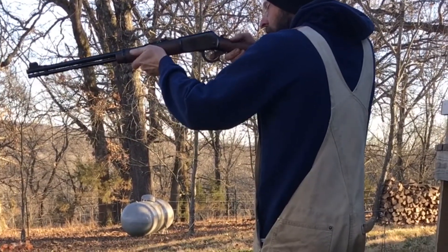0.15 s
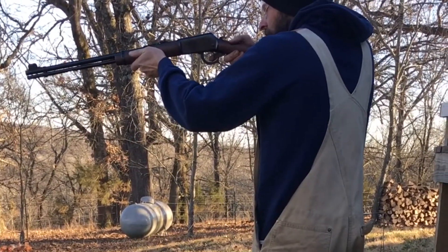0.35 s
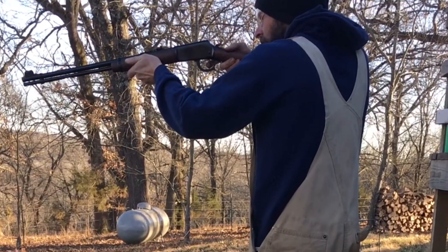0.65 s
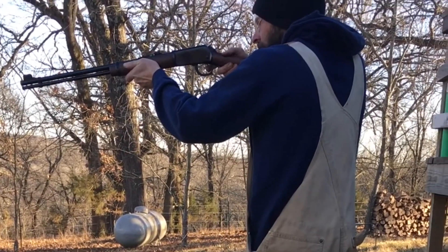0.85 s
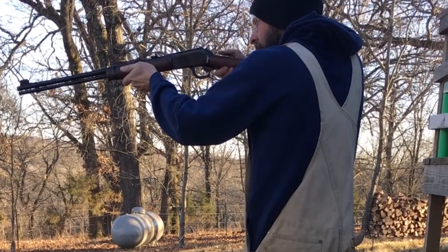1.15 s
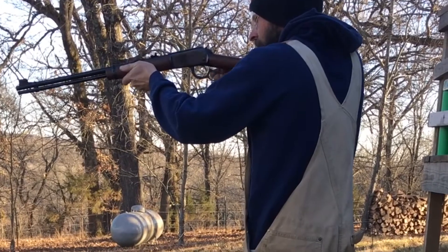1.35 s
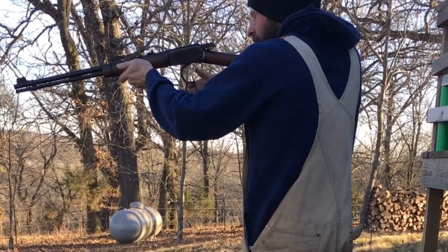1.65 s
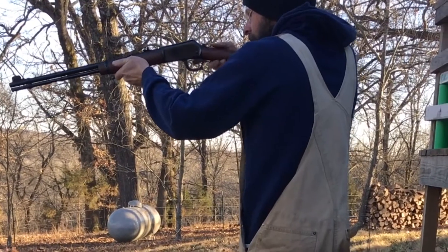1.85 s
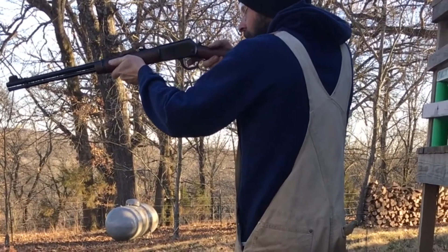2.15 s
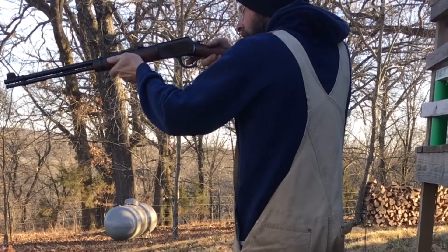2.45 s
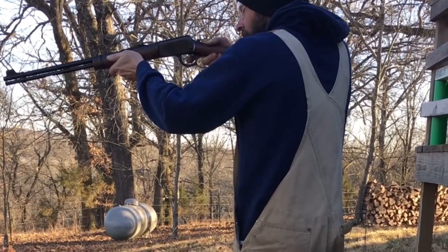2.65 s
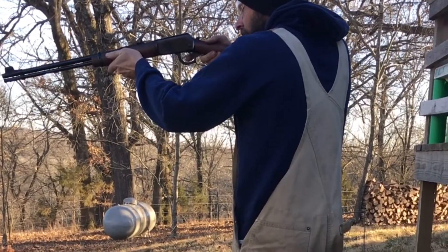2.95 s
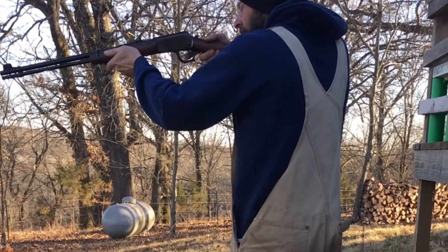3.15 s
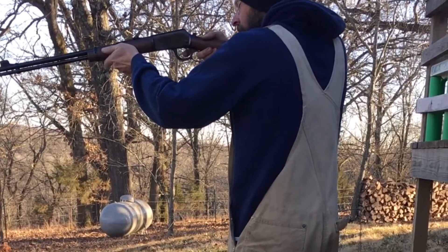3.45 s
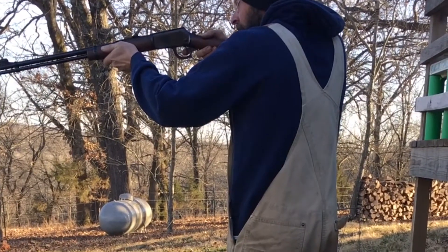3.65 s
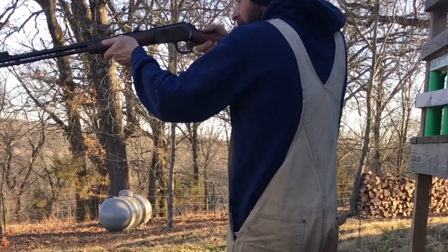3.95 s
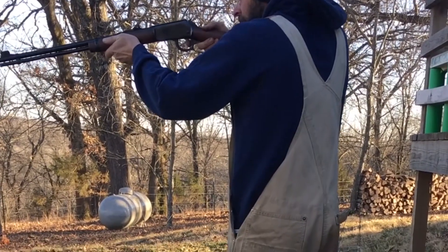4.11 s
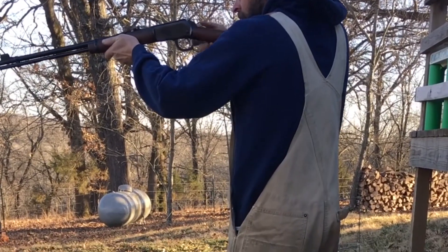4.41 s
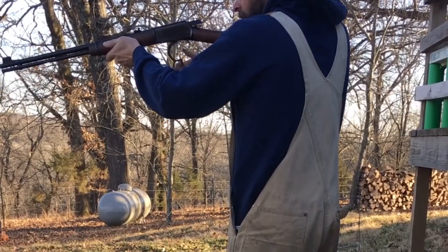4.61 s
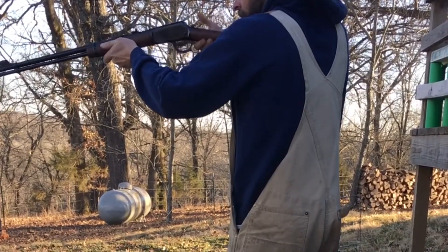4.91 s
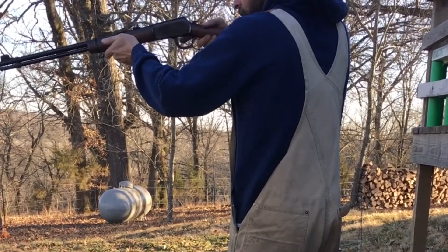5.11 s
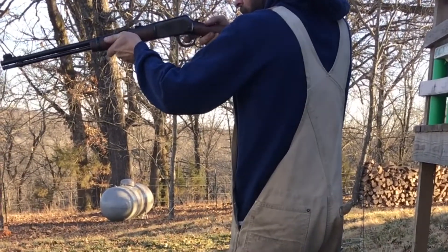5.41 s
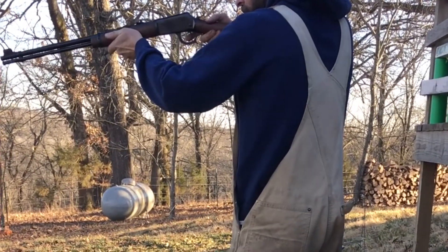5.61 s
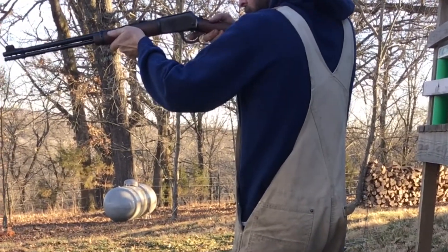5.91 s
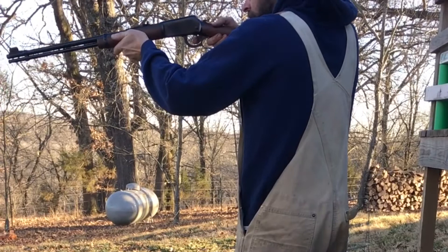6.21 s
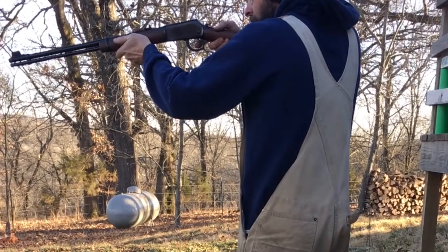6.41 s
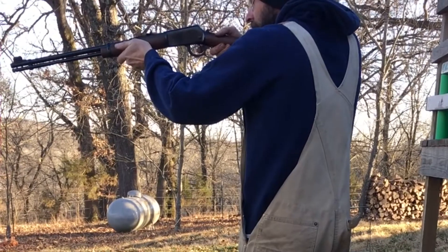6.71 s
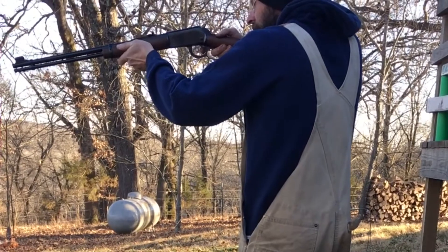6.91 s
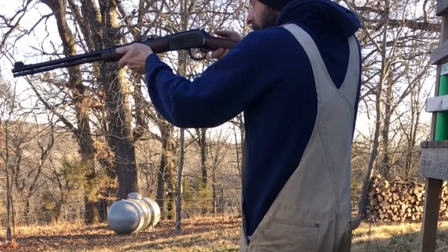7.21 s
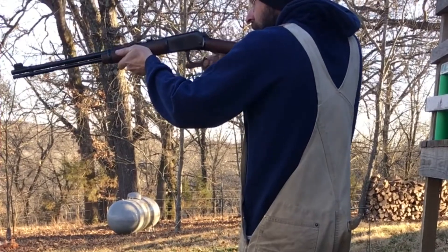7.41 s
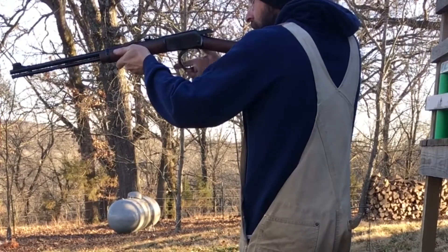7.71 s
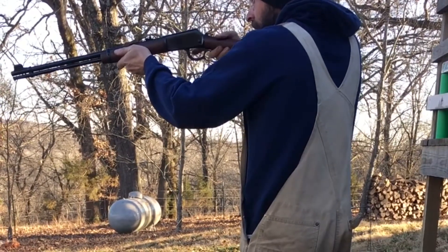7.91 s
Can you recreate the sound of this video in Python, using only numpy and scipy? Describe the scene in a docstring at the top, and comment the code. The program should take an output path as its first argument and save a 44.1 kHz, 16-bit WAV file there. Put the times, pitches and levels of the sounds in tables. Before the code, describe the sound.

A small lever-action rifle fires three spaced shots at ringing steel, echoing through trees, with two metallic clacks after each.

```python
"""Rifle shots at a steel target

At the edge of a wood a small lever-action rifle fires three times. The hammer falls, a shock wave
leaves the muzzle, the struck plate rings in its modes, and trunks, woods and far hills reflect the blast.
After each shot the lever clacks open and shut in a chain of steel impacts. Brass cases tinkle,
sleeves brush the gun and a foot shifts, over the hum of distant engines and a faint whine."""
import sys
import numpy as np
from scipy import signal
from scipy.fft import rfft, irfft, next_fast_len
from scipy.io import wavfile

SR = 44100
rng = np.random.default_rng(int(sys.argv[2]) if len(sys.argv) > 2 else 0)


def dump_mix(stems):
    """Bounce the given channels to the path in sys.argv[1] as a 16-bit WAV at rate SR."""
    frames = np.atleast_2d(stems).T  # one column per channel
    limited = np.clip(frames, -1, 1)  # hard clip at full scale
    pcm = np.round(limited * 32767).astype(np.int16)
    wavfile.write(sys.argv[1], SR, pcm)


N = 355446

# the three shots: start_s, blast_db, boom_db, first_swing_s, ground_bounce_s,
# woods_db, hills_db, trunks_db, target_delay_s, target_db
SHOTS = [(0.7185, -0.5, -6, 0.0041, 0.0036, -2, -4, -1.5, 0.069, 2.5),
         (3.8821, -0.5, -8, 0.0039, 0.0028, 0, 1, -1, 0.068, -0.5),
         (6.8070, -1.3, -11, 0.004, 0.0032, -5.5, -3, -8.5, .0709, 1.5)]
# spectrum of a small hard contact: frequency_hz, level_db
CONTACT_SPECTRUM = [(60, -38), (300, -31), (600, -26), (1100, -15), (1900, -14.5), (4000, -15.5),
                    (7000, -13.5), (10000, -15), (16000, -21)]


def amp(db):
    """Amplitude ratio of a level in decibels."""
    return 10 ** (np.asarray(db) / 20)


def read(points, hz):
    """Interpolation of a table along a logarithmic frequency axis."""
    table_hz, value = np.transpose(points)
    return np.interp(np.log(hz + 1), np.log(table_hz + 1), value)


def clock(seconds):
    """Uniform sample times from zero."""
    return np.arange(int(seconds * SR)) / SR


def add(mix, start_s, sound):
    """Superposition: a sound adds to the mix from its start time on."""
    part = mix[max(round(start_s * SR), 0):][:len(sound)]
    part += sound[:len(part)]


def waver(t, per_s):
    """Random fluctuation of about unit size, linear between per_s draws a second."""
    return np.interp(t * per_s, np.arange(1000), rng.standard_normal(1000))


def noise(spectrum, size, tilt_db=0, grain_db=0):
    """Filtered noise, tilted by tilt_db an octave; grain_db varies its level each millisecond."""
    fft_size = next_fast_len(size)
    hz = np.fft.rfftfreq(fft_size, 1 / SR)
    lumps = amp(grain_db * np.repeat(rng.standard_normal(size // 44 + 1), 44)[:size])
    white = rng.standard_normal(size) * lumps / np.sqrt(np.mean(lumps ** 2))
    octaves = np.log2(np.maximum(hz, 200) / 4000)
    colour = amp(read(spectrum, hz) + tilt_db * octaves)
    return irfft(rfft(white, fft_size) * colour, fft_size)[:size]


def ring(modes, t, detune, scatter_db=2):
    """Free vibration as a sum of damped modes; each blow excites them a little differently."""
    out = 0
    for hz, db, t60 in modes:
        pitch = hz * (1 + detune * rng.uniform(-0.89, 1))
        strength = rng.choice([-1, 1]) * amp(db + scatter_db * rng.uniform(-1, 1))
        out += strength * amp(-60 * t / t60) * np.sin(2 * np.pi * pitch * t)
    return out


def air():
    """Ambient noise: still air and far traffic give a steady spectrum, strongest in the bass."""
    # background spectrum: frequency_hz, level_db
    air_spectrum = [(20, -21.5), (40, -10.5), (62, 2.5), (90, -1.5), (130, -5), (170, -8), (310, -16.5),
                    (490, -20), (620, -12.5), (1200, -17.5), (1900, -21.5), (2800, -31.5), (5000, -35),
                    (15000, -40.5)]
    rumble = noise(air_spectrum, N)
    return amp(-60) * rumble / rumble.std()


def hum(hz, db, orders, waver_db=1.7):
    """Engine orders: partials at multiples of hz, each wavering on its way through the air."""
    t, turns = np.arange(len(hz)) / SR, np.cumsum(hz) / SR
    tone = 0
    for multiple, order_db in orders:
        gain = amp(order_db + waver_db * waver(t, 7.3))
        tone += gain * np.sin(2 * np.pi * (multiple * turns + rng.random()))
    return np.sqrt(2) * amp(db) * tone


def engines():
    """Pitch follows rotation speed: one distant engine slows, another fades in and speeds up."""
    # loudness contour of the slowing engine: time_s, level_db
    contour = [(0.0, -62), (0.55, -56.5), (1.08, -65.5), (1.35, -51.5), (2.15, -53), (2.56, -59.5),
               (3.2, -48), (3.75, -50), (4.2, -53.5), (4.9, -56), (5.6, -49.5), (6.1, -53), (6.55, -62.5),
               (7.2, -54), (7.6, -50.5), (8.06, -57)]
    # its orders: multiple, level_db
    orders = [(.5, -17), (1, -1), (2, -24.5)]
    t = np.arange(N) / SR
    slowing = hum(hz=116.2 - .52 * t, db=1 + np.interp(t, *np.transpose(contour)), orders=orders)
    since_full_s = t - 7.5
    rising_db = -52 + 22.5 * np.minimum(since_full_s, 0)
    speeding = hum(hz=121 + 6.8 * since_full_s, db=rising_db, orders=[(.5, -2.3), (1, -0.86)])
    return slowing + speeding


def whine():
    """A faint far tone, modulated in frequency and level along short parabolic arches."""
    # top of each arch: time_s, nominal_pitch_hz, level_db
    arches = [(3.449, 370, -69), (4.832, 368, -71), (5.35, 370, -65)]
    length_s, droop_hz, fade_db = .6, 38, 29.5
    out, t = np.zeros(N), clock(length_s)
    off_top = (2 * t / length_s - 1) ** 2
    for top_s, top_hz, db in arches:
        hz = top_hz - droop_hz * off_top + 4 * waver(t, 14)
        tone = hum(hz, db - fade_db * off_top, orders=[(0.99, 0.0025)], waver_db=1.5)
        add(out, top_s - length_s / 2, tone)
    return out


def handling():
    """Friction of hands and sleeves on the gun gives short bursts of noise."""
    # brushes: start_s, level_db, tilt_db_per_octave, decay_s
    brushes = [(.223, -44.5, 3.5, .003), (2.03, -48.5, 4.5, 0.018), (2.88, -51.5, 4, 0.0058),
               (3.112, -44.5, -6, .004), (5.183, -41.5, 1, 0.021), (5.615, -45, -3, 0.0042),
               (7.566, -33, -11, 0.0031), (7.6803, -29.5, 0, .0013), (8.043, -18, -2, 0.0054)]
    out, t = np.zeros(N), clock(.4)
    for start_s, db, tilt_db, decay_s in brushes:
        add(out, start_s, amp(db) * noise(CONTACT_SPECTRUM, len(t), tilt_db) * np.exp(-t / decay_s))
    return out


def clack(db, tilt_db, decay_s):
    """Impact of steel on steel: a snap and a rattle, exciting the receiver and the wooden stock."""
    # modes of receiver and stock: pitch_hz, level_db, t60_s
    rifle_modes = [(935, -29.5, .045), (1210, -27.5, .045), (1890, -34.5, 0.063), (2290, -36.5, 0.031),
                   (4390, -32.5, 0.039), (6670, -32, 0.057), (7160, -30.5, .05), (9900, -36.5, .04),
                   (11400, -31.5, 0.046)]
    t = clock(.15)
    snap = amp(1) * np.exp(-t / 0.00021)
    rattle = amp(-17.5) * np.exp(-t / 0.019)
    contact = noise(CONTACT_SPECTRUM, len(t), tilt_db) * (snap + np.exp(-t / decay_s) + rattle)
    stock_db = -21 - 1.5 * max(tilt_db, 0)  # bright, light parts hardly move the stock
    knock = amp(stock_db) * np.cos(2 * np.pi * 1100 * t) * np.exp(-t / 0.0023)
    return amp(db) * (contact + knock + ring(rifle_modes, t, detune=0.014))


def hammer():
    """Impact and rebound: the hammer falls just before each shot and bounces once."""
    lead_s, rebound_s = .0222, 0.013
    out = np.zeros(N)
    for shot_s, *_ in SHOTS:
        for lag_s, db in [(0, -19), (rebound_s, -21.5)]:
            add(out, shot_s - lead_s + lag_s, clack(db, tilt_db=-7.5, decay_s=0.0029))
    return out


def shock(t, push_s, damping=0.64):
    """A blast wave: a jump in pressure, positive for push_s, then suction."""
    age = np.maximum(t, 0) / push_s
    return (t > 0) * (1 - age) * np.exp(-damping * age)


def muzzle(blast_db, boom_db, swing_s, bounce_s):
    """The direct shock, its ground reflection and the slowing low swing of the overloaded microphone."""
    t = clock(.1)
    direct = amp(2.5) * shock(t - .0006, push_s=0.00033)
    reflected = amp(-6.5) * shock(t - bounce_s, push_s=.0011)
    age = t / swing_s
    envelope = np.exp(-((age - 3.8) / 3.7) ** 2) * np.minimum(age, 1)
    boom = np.cos(2 * np.pi * np.sqrt(age)) * envelope
    return amp(blast_db) * (direct + reflected) + amp(boom_db) * boom


def swell(t, arrival_s, db, rise_db_per_s, hold_s, fall_db_per_s):
    """An envelope of exponential growth, a plateau and exponential decay."""
    early_s, late_s = np.maximum(arrival_s - t, 0), np.maximum(t - arrival_s - hold_s, 0)
    return amp(db - rise_db_per_s * early_s - fall_db_per_s * late_s)


def scatter(spectrum, swells, seconds, grain_db, surge_db):
    """Diffuse scattering: countless small reflections merge into noise, whose swells add in power."""
    t = clock(seconds)
    envelope = np.sqrt(sum(swell(t, *row) ** 2 for row in swells))
    return noise(spectrum, len(t), grain_db=grain_db) * envelope * amp(surge_db * waver(t, 60))


def gunfire():
    """The bullet's crack and the muzzle blast, then reflections delayed by their longer paths."""
    # the blast scattered by ground and yard: frequency_hz, level_db
    blast_spectrum = [(40, -14), (150, -5.5), (300, -5), (430, -8), (800, -10), (1400, -2.5), (2500, -9.5),
                      (6000, -11), (10000, -15), (16000, -16.5)]
    # its decay off the ground, the yard and the trees: level_db, fall_db_per_s
    blast_stages = [(0.5, 721), (-10.5, 150.5), (-26, 33)]
    hold_s = .013
    stages = [(0, db, 0, hold_s, fall) for db, fall in blast_stages]
    out, t = np.zeros(N), clock(0.049)
    for start_s, blast_db, boom_db, swing_s, bounce_s, woods_db, hills_db, trunks_db, _, _ in SHOTS:
        crack = amp(-13) * noise(blast_spectrum, len(t)) * np.exp(-t / 0.0033)
        tail = scatter(blast_spectrum, stages, seconds=1.5, grain_db=2.0, surge_db=-0.15)
        add(out, start_s - .002, crack)
        add(out, start_s, muzzle(blast_db, boom_db, swing_s, bounce_s))
        add(out, start_s, amp(blast_db) * tail)
        add(out, start_s, amp(woods_db) * woods_roll())
        add(out, start_s, amp(hills_db) * hills_echo())
        add(out, start_s, amp(trunks_db) * trunk_echoes())
    return out


def reverberation(sound):
    """Convolution with decaying noise gives the thin outdoor tail of the surrounding trees."""
    # reverberation time: frequency_hz, t60_s
    decay_times = [(100, .4), (1500, 0.97), (7000, 0.99), (16000, 0.84)]
    hz, t, bands = signal.stft(rng.standard_normal(SR), SR, nperseg=256)
    decay = amp(-60 * t / read(decay_times, hz)[:, None])
    _, tail = signal.istft(bands * decay, SR, nperseg=256)
    return signal.fftconvolve(sound, tail / np.linalg.norm(tail))[:N]


def target():
    """The bullet splashes on the steel plate; the point of impact sets how hard each mode rings."""
    # plate modes: pitch_hz, t60_s, first_hit_db, second_hit_db, third_hit_db
    plate_modes = [(1414, .14, -27, -19, -21), (2765, 0.1, -18.5, -31, -18),
                   (2843, .095, -24.5, -31, -17.5), (4590, 0.082, -21, -19, -16.5),
                   (5245, 0.095, -36.5, -30, -40.5), (6680, 0.093, -18, -26, -19.5),
                   (6860, 0.11, -16, -18.5, -14), (7270, 0.19, -34, -36, -33),
                   (9150, 0.1, -27.5, -33, -23.5), (12525, 0.19, -25, -36, -36.5),
                   (14550, .2, -38.5, -36, -38.5)]
    # the bullet's splash: frequency_hz, level_db
    splash_spectrum = [(60, -19.5), (200, -17), (700, -20), (1300, -8.5), (2200, -3.5), (3600, -11.5),
                       (7000, -11.5), (11000, -14), (16000, -23.5)]
    splashes, rings, t = np.zeros(N), np.zeros(N), clock(0.44)
    for hit, (shot_s, *_, delay_s, db) in enumerate(SHOTS):
        modes = [(hz, levels[hit], t60) for hz, t60, *levels in plate_modes]
        splash = amp(db) * noise(splash_spectrum, len(t), grain_db=1.5) * np.exp(-t / .0085)
        clang = ring(modes, t, detune=.001, scatter_db=1.5)
        shimmer = 1 + .35 * waver(t, 330)  # the trees keep the ring shimmering
        add(splashes, shot_s + delay_s, splash)
        add(rings, shot_s + delay_s, clang * shimmer)
    return splashes + rings + reverberation(amp(-21) * splashes + amp(-20) * rings)


def woods_roll():
    """Backscatter: the near trees, the edge of the wood and its depth each return one swell."""
    # the roll from the woods: frequency_hz, level_db
    spectrum = [(50, -27), (170, -13), (380, -23), (620, -3), (900, -1.5), (1450, 2.5), (2200, -8),
                (3200, -19), (4500, -22.5), (7000, -37.5), (16000, -60)]
    # stands of trees: arrival_s, level_db, rise_db_per_s, hold_s, fall_db_per_s
    stands = [(.09, -29, 230, .05, 70), (.277, -16.5, 299.5, 0.028, 278.5), (.39, -21.5, 109.5, .14, 54.5)]
    return scatter(spectrum, stands, seconds=1.8, grain_db=3.3, surge_db=1.04)


def trunk_echoes():
    """Discrete reflections from trunks and sheds, each arriving again by way of the ground."""
    # reflections: delay_s, level_db
    echoes = [(0.1357, -8.5), (.244, -16), (0.2771, -2), (0.3546, -8.5), (.390, -10.5), (0.491, -18)]
    # colour of one echo: frequency_hz, level_db
    spectrum = [(50, -9), (170, -6.5), (400, -9.5), (700, 2), (1500, 4), (2300, -4), (3600, -14.5),
                (5000, -25.5), (8000, -26), (16000, -56)]
    bounce_s, bounce_db = 0.0055, -6.5
    out, t = np.zeros(SR), clock(0.049)
    envelope = np.exp(-t / 0.0027) * (1 - np.exp(-t / 0.00045))
    for delay_s, db in echoes:
        slap = amp(db) * noise(spectrum, len(t)) * envelope
        add(out, delay_s, slap)
        add(out, delay_s + bounce_s, amp(bounce_db) * slap)
    return out


def hills_echo():
    """Scattering over a long path: the far hills answer late, faintly and slowly."""
    # the return from the hills: frequency_hz, level_db
    spectrum = [(100, -20), (400, -18), (650, 3.5), (1100, 5), (1600, -3.5), (2300, -23.5), (4000, -26.5),
                (16000, -61)]
    arrival_s, db, rise_db_per_s, hold_s, fall_db_per_s = 1.58, -50, 60, 0.39, 19.5
    swells = [(arrival_s, db, rise_db_per_s, hold_s, fall_db_per_s)]
    return scatter(spectrum, swells, seconds=3.4, grain_db=3.0, surge_db=1.0)


def lever():
    """Two chains of impacts: the lever unlocks, ejects and stops, then feeds a cartridge and locks."""
    # opening strokes: stop_s, level_db, since_unlock_s
    openings = [(1.4554, -4, .0544), (4.612, -5.5, .0545), (7.4881, -2.5, .0672)]
    # closing strokes: lock_s, level_db, since_feed_s
    closings = [(1.7540, -0.5, .0483), (4.9125, -1.5, .0554), (7.7856, -1.5, .0555)]
    # each contact: level_db, tilt_db_per_octave, decay_s
    unlock, eject, stop = (-17, 4, .0014), (-17, 3.1, 0.0023), (0, -0.66, 0.0018)
    carrier, feed, scrape = (-34, 4, .001), (-19, -2, 0.0059), (-25.5, 0.93, 0.0017)
    latch, lock, slap = (-17, 2, .0017), (-1.3, 1.6, 0.0019), (-2.5, 2.5, 0.0031)
    out = np.zeros(N)

    def stroke(end_s, stroke_db, contacts):
        """Each impact sounds at its own offset in seconds from the end of travel."""
        for offset_s, (db, tilt_db, decay_s) in contacts:
            add(out, end_s + offset_s, clack(stroke_db + db, tilt_db, decay_s))

    for stop_s, db, travel_s in openings:
        stroke(stop_s, db, [(-travel_s, unlock), (-0.025, eject), (0, stop)])
    for lock_s, db, travel_s in closings:
        scrapes = [(-travel_s * share, scrape) for share in rng.random(size=5)]
        stroke(lock_s, db, [(-travel_s - .0085, carrier), (-travel_s, feed), *scrapes])
        stroke(lock_s, db, [(-.006, latch), (0, lock), (.0046, slap)])
    low_cut = signal.butter(2, 480, "high", fs=SR, output="sos")  # the lever's clacks carry little bass
    return signal.sosfilt(low_cut, out)


def spent_cases():
    """Brass cases land and hop on more softly; each impact ticks and excites their modes."""
    # landings: start_s, level_db
    landings = [(1.41, -40), (1.5, -60), (1.941, -54), (2.424, -52.5), (3.452, -64), (5.485, -55),
                (6.495, -59)]
    # modes of a case: pitch_hz, level_db, t60_s
    brass_modes = [(2280, -11, .12), (4360, -7, .15), (4484, -5, 0.16), (7060, -11, .15),
                   (9430, -10.5, .25), (10056, -19, .2), (12618, -6, 0.2)]
    out, t = np.zeros(N), clock(.4)
    for start_s, db in landings:
        for bounce in range(4):
            tick = amp(15) * noise(CONTACT_SPECTRUM, len(t), tilt_db=-3.5) * np.exp(-t / 0.0064)
            hop_s = bounce * 0.016 * rng.uniform(.7, 1.6)
            tinkle = amp(-4.5) * ring(brass_modes, t, detune=0.007)
            add(out, start_s + hop_s, amp(db - 5 - 3 * bounce) * (tick + tinkle))
    return out


def footstep():
    """Friction of a foot shifting on the ground gives one dull burst of noise."""
    # the scuff: frequency_hz, level_db
    spectrum = [(60, -6.5), (260, 4.5), (500, -5), (1000, -14.5), (3200, -26), (9000, -41), (16000, -47.5)]
    start_s, db, rise_s, decay_s = 6.085, -30.5, 0.0043, 0.11
    out, t = np.zeros(N), clock(.4)
    envelope = np.exp(-t / decay_s) * (1 - np.exp(-t / rise_s))
    add(out, start_s, amp(db) * noise(spectrum, len(t), grain_db=1.5) * envelope)
    return out


def scene():
    """Superposition of all sources at one microphone beside the shooter."""
    action = hammer() + lever()
    rifle = gunfire() + target() + action + reverberation(amp(-31) * action)
    return (rifle + spent_cases() + handling() + footstep() + air() + engines() + whine())[None]


def record(dry):
    """Soft saturation rounds the loudest peaks; a low-pass filter then limits the band."""
    ceiling, edge_hz = .95, 16000
    rounded = dry / (1 + abs(dry / ceiling) ** 6) ** (1 / 6)
    low_pass = signal.firwin(255, edge_hz, window=("kaiser", 8), fs=SR)
    return signal.oaconvolve(rounded, low_pass[None], "same")


dry = scene()
out = record(dry)
dump_mix(out)
```